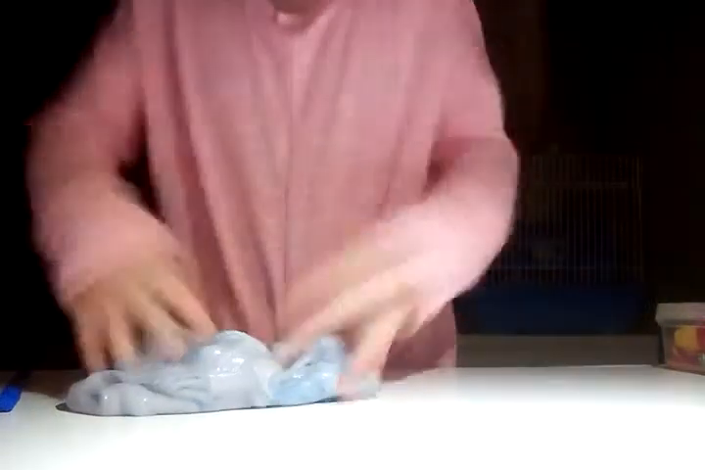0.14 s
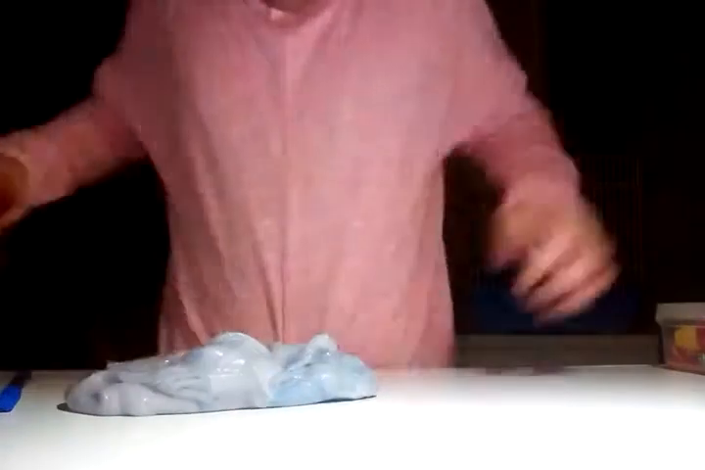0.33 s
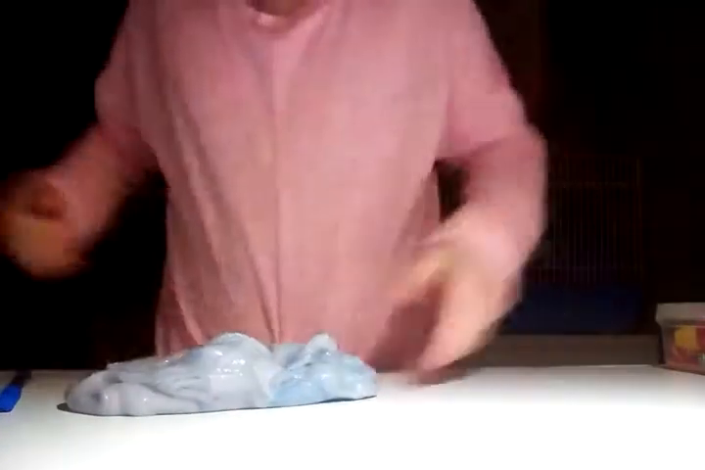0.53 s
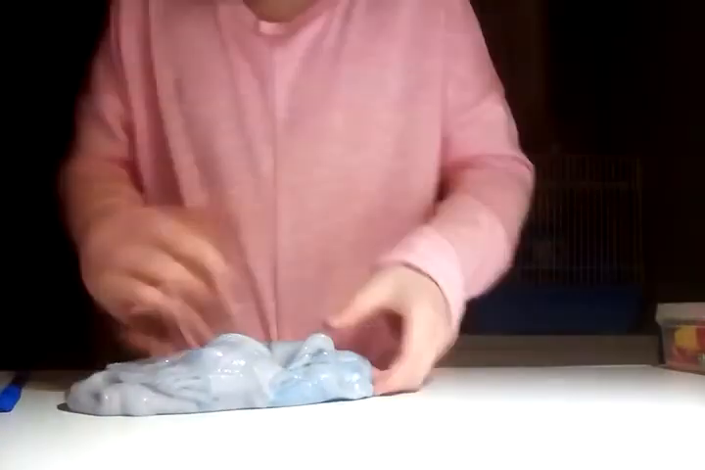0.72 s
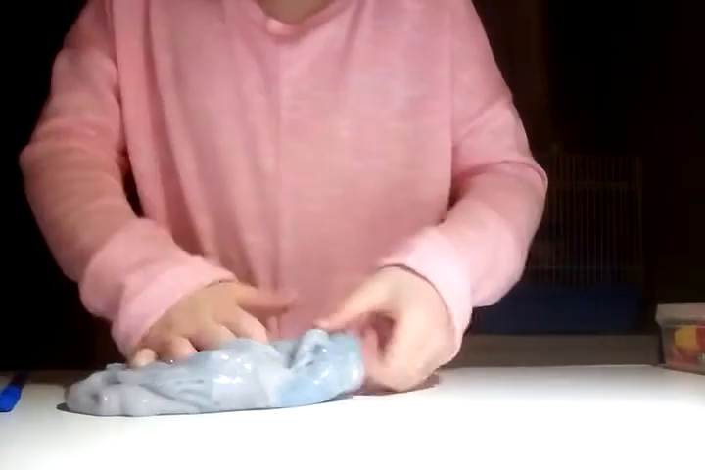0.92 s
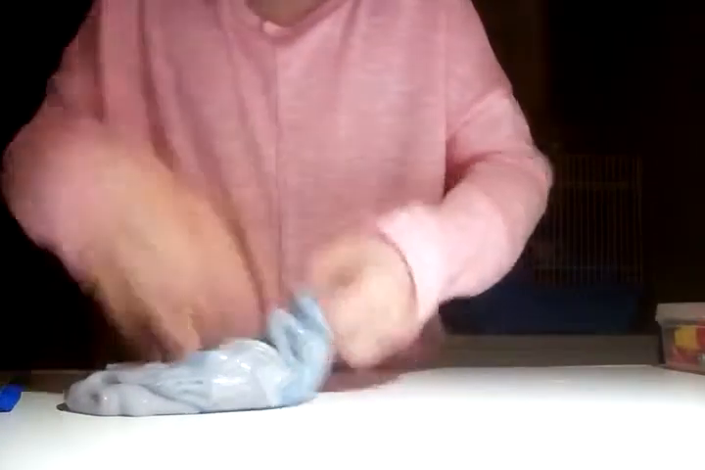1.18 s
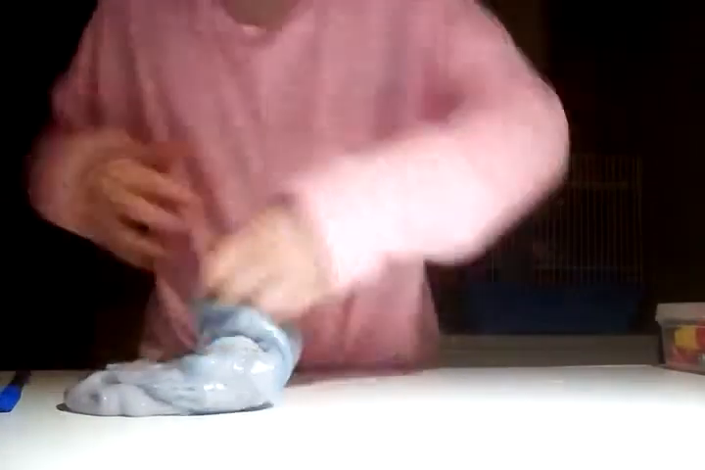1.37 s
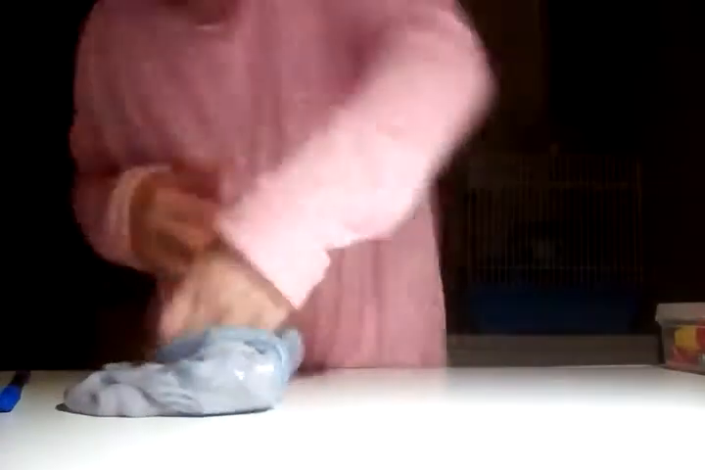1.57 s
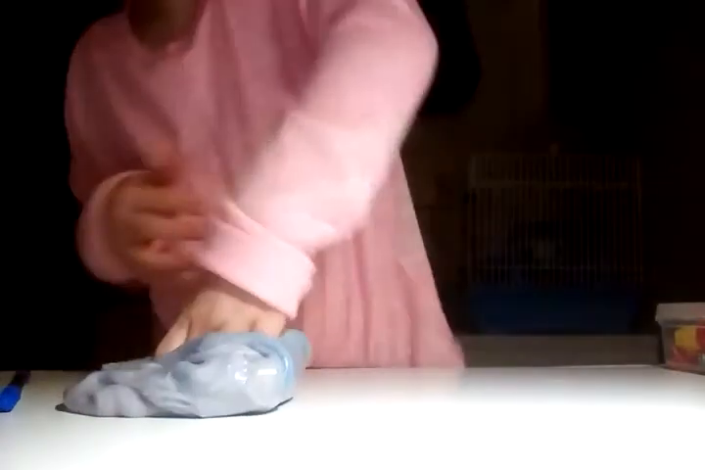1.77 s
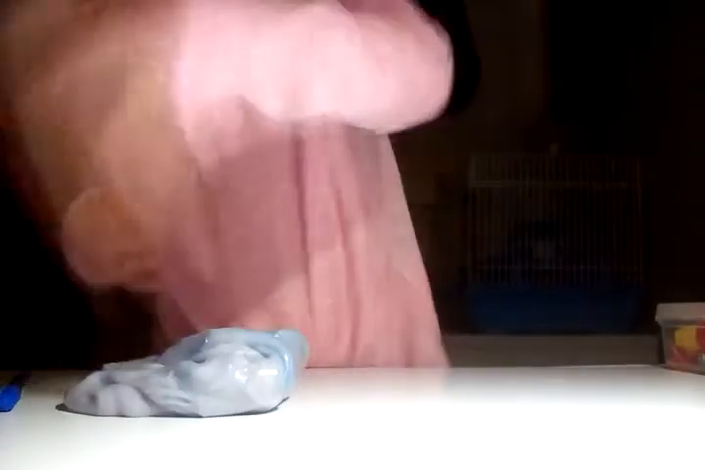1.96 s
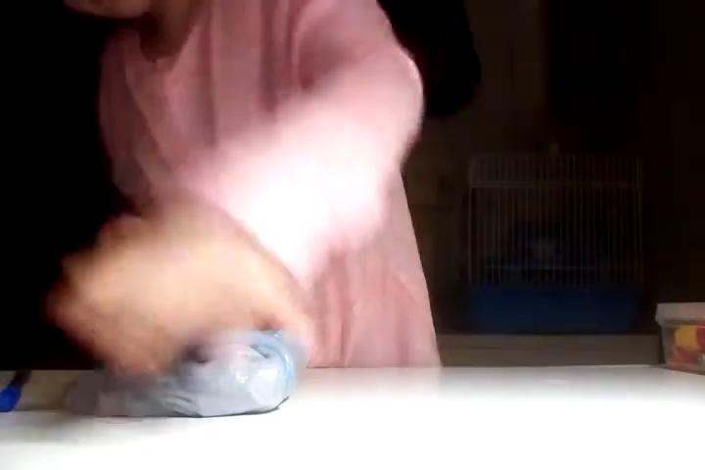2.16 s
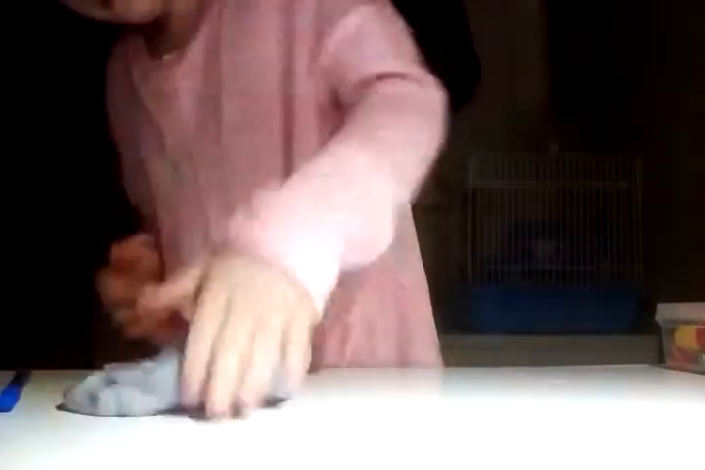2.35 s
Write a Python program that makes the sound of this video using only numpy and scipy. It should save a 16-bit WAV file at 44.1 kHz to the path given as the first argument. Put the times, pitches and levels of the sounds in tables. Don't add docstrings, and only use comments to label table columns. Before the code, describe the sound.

Slime slapped and squished by hand on a tabletop, wet smacks, pops and low thuds indoors

```python
import sys
import numpy as np
from scipy import signal
from scipy.fft import rfft, irfft, next_fast_len
from scipy.io import wavfile
from scipy.ndimage import uniform_filter1d, map_coordinates

SR = 44100
rng = np.random.default_rng(int(sys.argv[2]) if len(sys.argv) > 2 else 0)


def persist_wave(psi):
    counts = np.round(np.clip(psi, -1, 1) * 32767).astype(np.int16)
    wavfile.write(sys.argv[1], SR, np.atleast_2d(counts).T)


def nominal_scale(level):
    x = np.asarray(level, float) / 20
    return 10 ** x


N = 110250


def unit(x):
    return x / np.sqrt(np.mean(x ** 2) + 1e-20)


def along(points, hz):
    f, value = np.transpose(points)
    return np.interp(np.log(hz + 1), np.log(f + 1), value)


def over_time(points):
    return np.interp(np.arange(N) / SR, *np.transpose(points))


def wobble(rate):
    knots = rng.standard_normal(int(N * rate / SR) + 4)
    return map_coordinates(knots, [np.arange(N) * rate / SR])


def filtered(x, response):
    size = next_fast_len(N + SR // 2)
    spectrum = rfft(x, size) * response(np.fft.rfftfreq(size, 1 / SR))
    return irfft(spectrum, size)[..., :N]


def bump(hz, centre, width):
    return 1 / (1 + ((hz - centre) / width * 2) ** 2)


def above(hz, edge):
    return 1 / (1 + (edge / (hz + 1)) ** 4)


# f/Hz, width/Hz, level/dB
HOUSING = [(1090, 100, 4), (2790, 500, 5.5), (4540, 360, 7.5), (6244, 410, 7)]


def noise(spectrum):
    def response(hz):
        housing_db = sum(db * bump(hz, centre, width) for centre, width, db in HOUSING)
        return nominal_scale(along(spectrum, hz) + housing_db)
    return unit(filtered(rng.standard_normal(N), response))


def add(out, s, sound):
    part = out[round(s * SR):][:len(sound)]
    part += sound[:len(part)]


def spatter(x, depth_db, size):
    z = signal.stft(x, nperseg=size)[2]
    field = uniform_filter1d(rng.standard_normal(z.shape), 2, 0)
    field = uniform_filter1d(field, 2, 1)
    return unit(signal.istft(z * nominal_scale(depth_db * unit(field)), nperseg=size)[1][:N])


# f/Hz, level/dB per Hz
AIR_COLOUR = [(20, -9.5), (55, -16.5), (105, -5), (250, -22.5), (1300, -34), (6800, -49), (8000, -52),
              (15400, -55.5)]


def still_air():
    return nominal_scale(-61.5) * noise(AIR_COLOUR)


# f/Hz, width/Hz, level/dB
EARLIER_RINGS = [(850, 930, -46.5), (4300, 140, -60), (4800, 140, -63.5)]


def earlier_slap():
    t60 = 0.71
    rings = np.zeros(N)
    for centre, width, db in EARLIER_RINGS:
        hiss = rng.standard_normal(N)
        rings += nominal_scale(db) * unit(filtered(hiss, lambda hz: bump(hz, centre, width)))
    return rings * nominal_scale(-60 * np.arange(N) / SR / t60)


# t/s, level/dB
EFFORT = [(0, -53), (0.161, -56), (0.353, -44.5), (0.501, -82), (0.618, -61.5), (0.719, -61),
          (0.859, -57.5), (1.05, -53.5), (1.17, -49.5), (1.362, -53.5), (1.56, -80), (1.66, -55.5),
          (1.86, -48), (2.047, -54.5), (2.202, -66.5), (2.299, -58), (2.5, -46.5)]
# f/Hz, level/dB per Hz
STICKY_COLOUR = [(100, -42), (200, 2.5), (800, -2), (1900, -12.5), (4200, -24), (6800, -33.5), (8000, -49),
                 (15400, -67)]


def crackle():
    grain = nominal_scale(0.5 * wobble(210) + 0.98 * wobble(36))
    ticking = unit(spatter(noise(STICKY_COLOUR), 2.9, size=256) * grain)
    return nominal_scale(over_time(EFFORT) - 2) * ticking


def moving(curve, spectrum, lumpy_db):
    return nominal_scale(over_time(curve) + lumpy_db * wobble(6.6)) * noise(spectrum)


# t/s, level/dB
SLEEVE_MOVES = [(0, -71), (.3, -66), (.5, -73), (.8, -74), (1, -68), (1.3, -61.5), (1.5, -69.5),
                (1.58, -74.5), (1.8, -67), (2.05, -74.5), (2.3, -75), (2.5, -62.5)]
# f/Hz, level/dB per Hz
CLOTH_COLOUR = [(1500, -41), (3000, -9), (4200, -6), (5400, -1.5), (6700, -6), (7300, -17.5), (8200, -32),
                (15400, -35)]


def sleeves():
    return moving(SLEEVE_MOVES, CLOTH_COLOUR, lumpy_db=2.0)


# t/s, level/dB
WEIGHT = [(0, -58.5), (.2, -53), (.42, -47.5), (.55, -65.5), (.7, -50), (.82, -67.5), (.9, -49.5),
          (1.1, -54.5), (1.3, -49.5), (1.45, -57), (1.6, -58.5), (1.68, -57), (1.8, -59.5), (2.1, -49),
          (2.3, -55.5), (2.5, -47)]
# f/Hz, level/dB per Hz
TOP_COLOUR = [(20, -14.5), (60, -11), (105, 2), (170, -13), (260, -28), (600, -59)]


def leaning():
    return moving(WEIGHT, TOP_COLOUR, lumpy_db=2.5)


# t/s, peak level/dB, f/Hz, life/s
PALM_POPS = [(.178, -33.5, 1025, 0.0052), (0.1991, -8, 902, 0.0028), (.204, -4.5, 352, 0.0052),
             (.2125, -13, 657, 0.013), (.2205, -9, 529.6, 0.011), (.231, -25, 614, 0.012),
             (0.245, -3, 875, 0.004), (.252, -18, 786, 0.0085), (0.261, -26.5, 508, 0.016),
             (1.191, -30.5, 1098, 0.0066), (1.203, -25, 715, 0.0032), (1.211, -23.5, 1054, 0.012),
             (1.218, -14.5, 457, 0.0026), (1.223, -17.5, 361, 0.0081), (1.232, -27.5, 528, 0.0093),
             (1.246, -38, 291, 0.0316), (1.955, -28.5, 492, 0.016), (1.969, -23.5, 699, 0.0089),
             (1.974, -11, 383, 0.0041), (1.986, -22.5, 1049, 0.0078), (1.994, -18.5, 513.5, 0.013),
             (1.998, -23, 334, 0.0052), (2.006, -17, 325, 0.007)]
# t/s, peak level/dB, f/Hz, life/s
FINGERTIP_POPS = [(0.353, -19, 1093, 0.0034), (0.363, -30.5, 506, 0.0048), (0.6507, -30.5, 1107, 0.0032),
                  (0.656, -28, 370, 0.0039), (0.807, -34, 1037, 0.0039), (0.816, -35.5, 403, 0.0037),
                  (.903, -38.5, 1077, 0.0042), (1.0027, -31.5, 1090, 0.0038), (1.001, -26, 2794, 0.0057),
                  (1.061, -39, 1090, 0.0044), (1.098, -33.5, 2720, 0.0043), (1.098, -52, 11800, 0.0029),
                  (1.115, -36, 527, 0.0106), (1.608, -34.5, 1007, 0.0033), (1.62, -42, 910, 0.0071),
                  (1.624, -31, 390, 0.0059), (1.655, -27.5, 1138, 0.0033), (1.668, -33, 387, 0.0082),
                  (1.728, -31.5, 850, 0.003), (1.731, -28.5, 527, 0.0093), (1.785, -40.5, 1120, 0.0098),
                  (1.86, -50.5, 420, 0.0091), (1.909, -37.5, 544, 0.0088), (2.353, -34, 1060, 0.0073),
                  (2.36, -29.5, 323.5, 0.013), (2.402, -33.5, 494, 0.0076), (2.438, -31.5, 345, 0.0058),
                  (2.481, -34, 1090, 0.006)]
# t/s, peak level/dB, f/Hz, life/s
TINY_POPS = [(.185, -32, 450, 0.0069), (.2005, -23.5, 1340, .002), (.216, -10.5, 1053, 0.0052),
             (.652, -45, 3060, .003), (.652, -39, 1877, .003), (.951, -50, 1470, 0.0021),
             (.979, -41, 1450, 0.0022), (1.0015, -32.5, 3310, 0.0028), (1.103, -45, 2830, 0.0033),
             (1.224, -18.5, 528, 0.0034), (1.236, -24.5, 1106, 0.0029), (1.248, -34, 1120, 0.0035),
             (1.257, -31, 600, .004), (1.727, -47.5, 1840, 0.0048), (1.784, -43.5, 2520, 0.0042),
             (1.943, -41.5, 1270, 0.0047), (1.952, -29, 970, 0.0018), (1.968, -44, 1920, .002),
             (1.973, -33, 2785, 0.0037), (2.021, -37, 1060, 0.0042), (2.361, -39, 1633, 0.0049),
             (2.436, -38.5, 1090, .01)]


def pops():
    rise, sag, rough = 0.24, 0.04, 0.42
    overtone_db = -22.5
    out, t = np.zeros(N), np.arange(SR // 10) / SR
    for s, db, hz, life in PALM_POPS + FINGERTIP_POPS + TINY_POPS:
        knots = rng.standard_normal((2, 512))
        timing, strength = map_coordinates(knots, [[0 * t, 0 * t + 1], [t * hz, t * hz]])
        age = t / life
        sagging = t * (1 + sag) - sag * t * np.minimum(age, 3) / 2
        phase = 2 * np.pi * hz * sagging + rough * timing
        body = np.sin(phase) + nominal_scale(overtone_db) * np.sin(2 * phase + strength)
        swell = (1 - np.exp(-age / rise)) ** 2 * np.exp(-age ** 1.11)
        add(out, s, 1.62 * nominal_scale(db) * swell * (1 + rough * np.tanh(strength)) * body)
    return out


# t/s, level/dB, brightness/dB, t60/s
SKIN_SMACKS = [(0.19, -36.5, -4, 0.027), (0.197, -19, -4, 0.17), (0.2424, -18, -0.5, 0.071),
               (0.271, -29.5, 5, 0.094), (0.283, -32, 11, 0.028), (0.353, -49, 9.5, 0.05),
               (0.649, -44.5, -10, 0.067), (0.806, -50, 0, 0.022), (.877, -68, -4, 0.028),
               (0.903, -46.5, -2.5, 0.086), (1.0015, -39.5, -2.5, 0.1), (1.061, -40.5, 3.5, 0.025),
               (1.099, -46.5, -3, 0.134), (1.16, -54.5, 11.5, 0.052), (1.189, -32.5, -6.5, 0.2),
               (1.204, -28, -1, 0.15), (1.437, -62, 12, 0.21), (1.591, -55, -3, 0.037),
               (1.606, -37, 0, 0.063), (1.617, -39, 7.5, 0.0535), (1.652, -38.5, -10, 0.073),
               (1.664, -55, 10, 0.062), (1.782, -53, 11.5, 0.077), (1.908, -38.5, -4, 0.055),
               (1.946, -29.5, -17, 0.15), (1.964, -23, -9, 0.11), (1.99, -31, 0.5, 0.07),
               (2.011, -39.5, -2.5, 0.043), (2.355, -43, -4, 0.046)]
# t/s, level/dB, brightness/dB, t60/s
FINAL_SMACKS = [
    (2.431, -40, -3, 0.16),
    (2.48, -43.5, 8.5, 0.04),
    (2.494, -36, 9.5, 0.11),
]
# f/Hz, level/dB per Hz
WET_COLOUR = [(150, -38.5), (330, 2.5), (1000, -8.5), (1450, -12), (2740, -17.5), (6500, -20),
              (7870, -39.5), (15400, -45.5)]


def smacks():
    bright_hz, fizz_hz = 2350, 8000
    power, t = np.zeros((3, N)), np.arange(SR // 2) / SR
    for s, db, bright_db, t60 in SKIN_SMACKS + FINAL_SMACKS:
        rise = 0.085 * t60 ** 2 + 0.0015
        burst = nominal_scale(db - 60 * (t / t60) ** 1.33) * (1 - np.exp(-t / rise))
        for share, band in zip((0, 1, 1.4), power):
            add(band, s, (burst * nominal_scale(share * bright_db)) ** 2)
    droplets = spatter(noise(WET_COLOUR), 4.5, size=128)
    wet = unit(droplets * nominal_scale(0.5 * wobble(420)))

    def split(hz):
        bright, fizz = above(hz, bright_hz), above(hz, fizz_hz)
        return np.array([1 - bright, bright - fizz, fizz])
    return (np.sqrt(power) * filtered(wet, split)).sum(0)


# t/s, peak level/dB, f/Hz
PUSHES = [(0.201, -14.5, 86.8), (0.242, -17.5, 115.5), (0.299, -22.5, 116.4), (0.353, -28, 119.7),
          (0.399, -36.5, 115.9), (0.651, -28, 98.5), (0.866, -34, 98), (0.908, -24, 117), (0.928, -23, 103),
          (1.215, -24.5, 182.5), (1.24, -21.5, 111), (1.91, -36.5, 107), (1.954, -16.5, 102.6),
          (1.971, -12.5, 102.2), (2.004, -15, 110.7), (2.061, -26, 108.6), (2.358, -20, 108.3),
          (2.396, -32, 110.4), (1.663, -40, 97.7), (2.02, -20.5, 108.6)]


def table():
    rise, t60 = 0.0053, 0.18
    second, second_db = 1.4, -3.5
    out, t = np.zeros(N), np.arange(SR // 2) / SR
    fall_db = -60 * (t / t60) ** 1.066
    for s, db, hz in PUSHES:
        first_mode = np.sin(2 * np.pi * hz * t)
        second_mode = np.sin(2 * np.pi * hz * second * t + rng.uniform(0, 2 * np.pi))
        ring = first_mode + nominal_scale(second_db + fall_db) * second_mode
        add(out, s, -nominal_scale(db + fall_db) * (1 - np.exp(-t / rise)) * ring)
    unsteady = out * (1 + 0.3 * wobble(70))
    return filtered(unsteady, lambda hz: above(hz, 62.4))


# t/s, peak level/dB, f/Hz
THREADS = [(.3966, -50.5, 5000), (.4565, -52, 5210), (.7358, -59, 5230), (0.7768, -52.5, 4850),
           (.7772, -58, 6100), (0.875, -50, 5200), (.9149, -46.5, 6400), (1.002, -37, 6100),
           (1.002, -34.5, 4720), (1.1, -45, 5900), (1.618, -28.5, 6390), (1.62, -36.5, 4800),
           (1.669, -44.5, 6400), (1.7846, -38.5, 6300), (2.361, -43.5, 4800)]


def snaps():
    t60, rise, width = 0.022, 0.0009, 0.1
    out, t = np.zeros(N), np.arange(SR // 16) / SR
    for s, db, hz in THREADS:
        near = np.exp(-((np.fft.rfftfreq(len(t), 1 / SR) / hz - 1) / width) ** 2)
        hiss = unit(irfft(rfft(rng.standard_normal(len(t))) * near, len(t)))
        add(out, s, nominal_scale(db - 3 - 60 * t / t60) * (1 - np.exp(-t / rise)) * hiss)
    return out


# f/Hz, t60/s
ROOM_DECAY = [(100, 0.32), (1000, 0.16), (8000, 0.11)]


def room(x):
    steady = 0.8
    hz, t, z = signal.stft(rng.standard_normal(SR // 2), SR, nperseg=256)
    fading = z * nominal_scale(-60 * t / along(ROOM_DECAY, hz)[:, None])
    tail = signal.istft(fading, SR, nperseg=256)[1]
    delayed = np.pad(x, (200, 0))
    answer = signal.fftconvolve(delayed, tail / np.linalg.norm(tail))[:N]
    return nominal_scale(-14.5) * answer * (steady + wobble(500)) / np.hypot(steady, 1)


def scene():
    around = still_air() + earlier_slap() + crackle() + sleeves() + leaning()
    near = pops() + smacks() + snaps()
    return (near + table() + room(near) + around)[None]


def roll_off(x):
    return signal.sosfilt(signal.butter(12, 15560, fs=SR, output="sos"), x)


def record(dry):
    mix = filtered(dry, lambda hz: hz < 15560)
    return roll_off(mix)


dry = scene()
out = record(dry)
persist_wave(out)
```